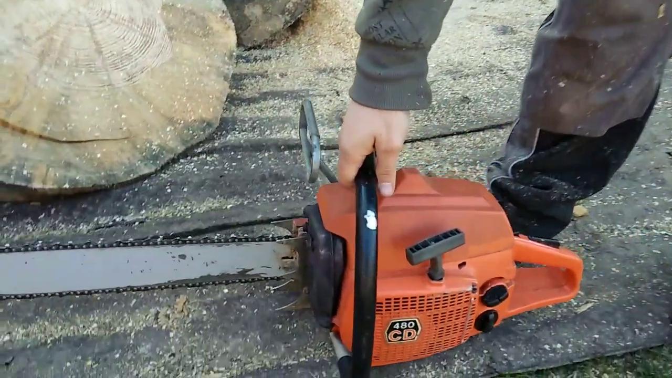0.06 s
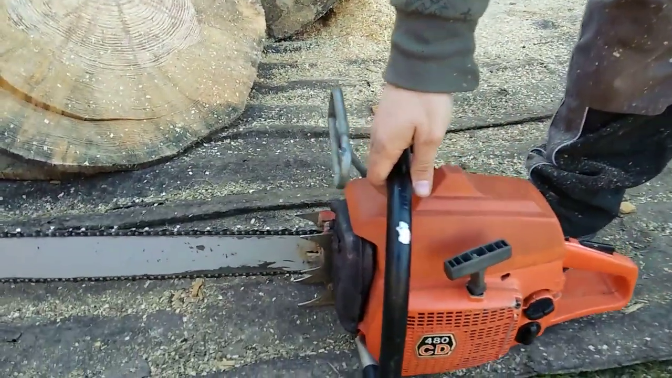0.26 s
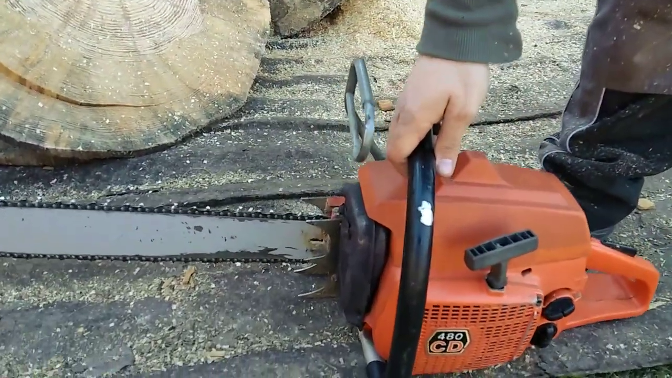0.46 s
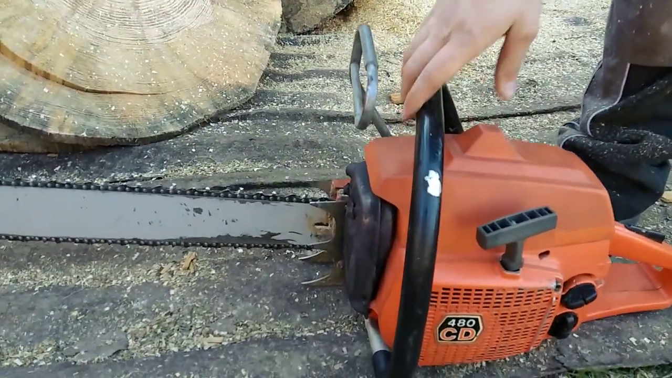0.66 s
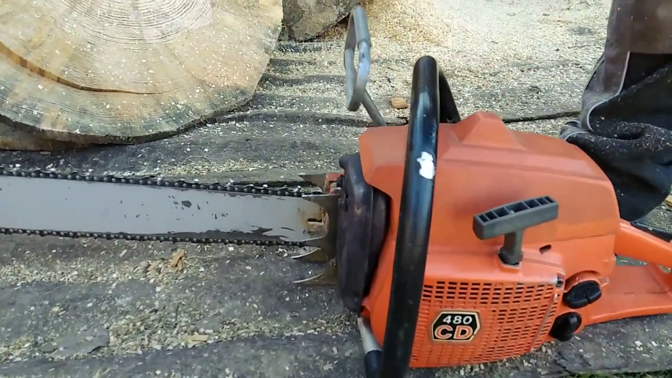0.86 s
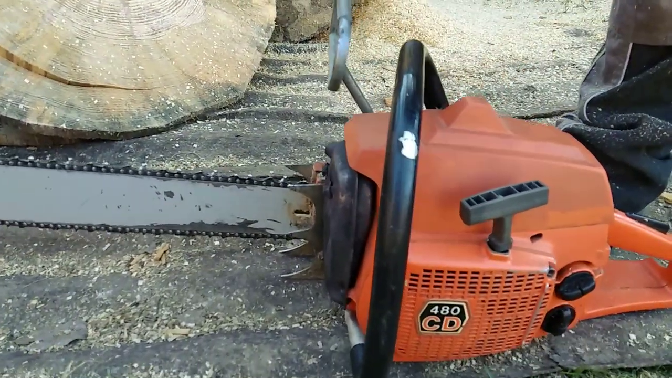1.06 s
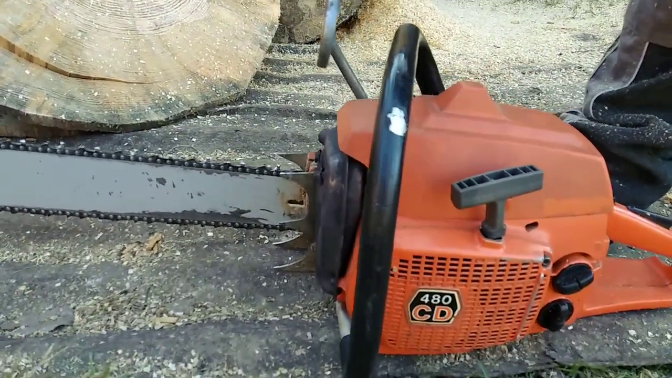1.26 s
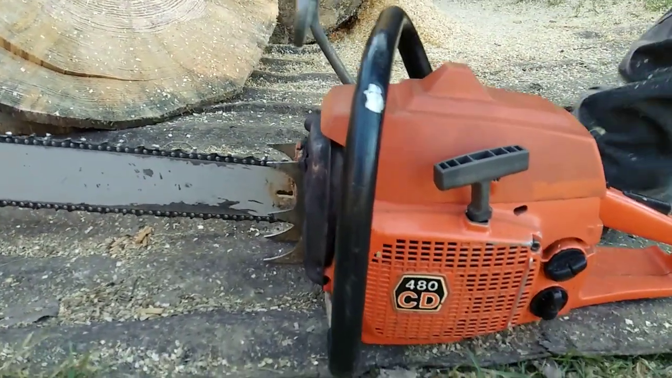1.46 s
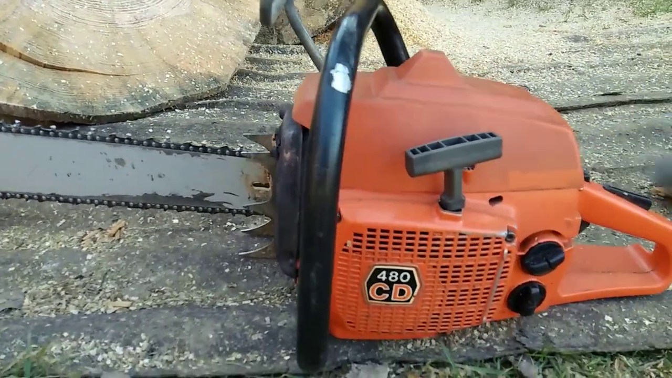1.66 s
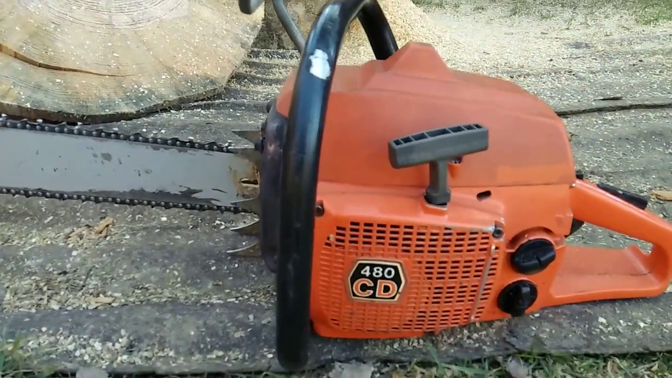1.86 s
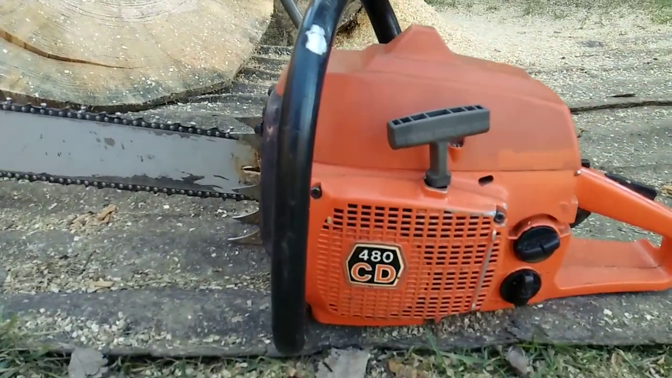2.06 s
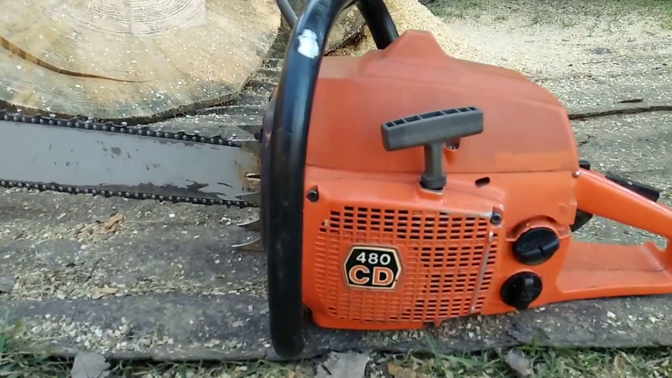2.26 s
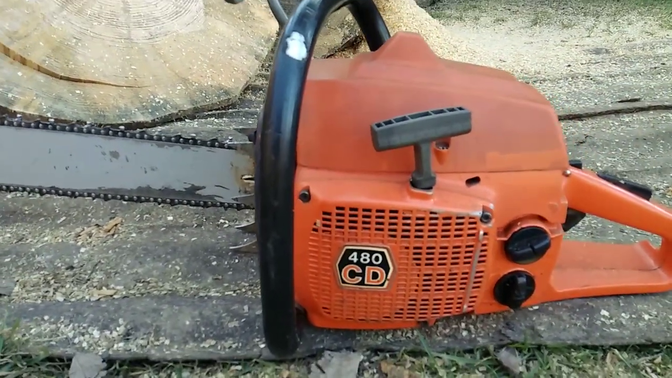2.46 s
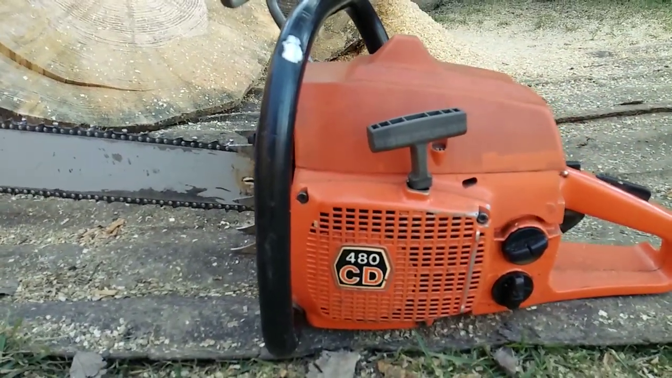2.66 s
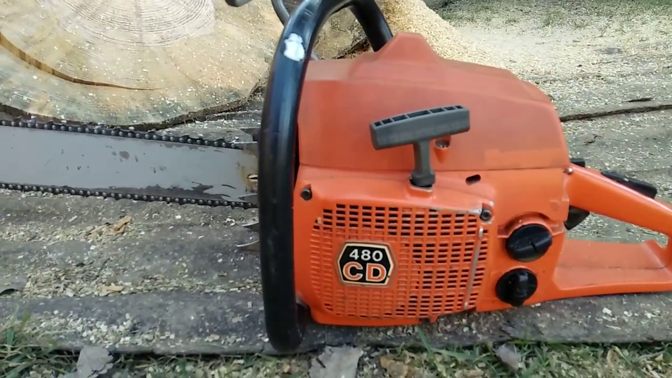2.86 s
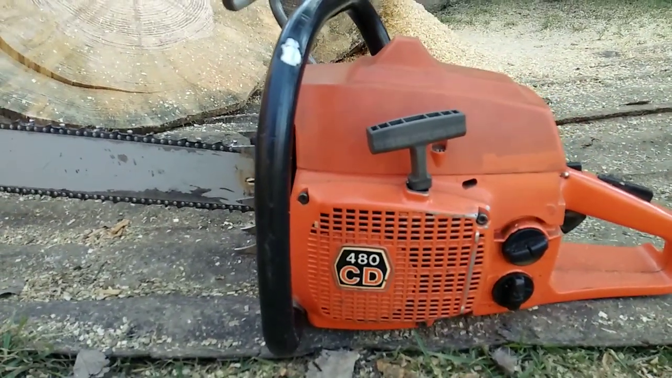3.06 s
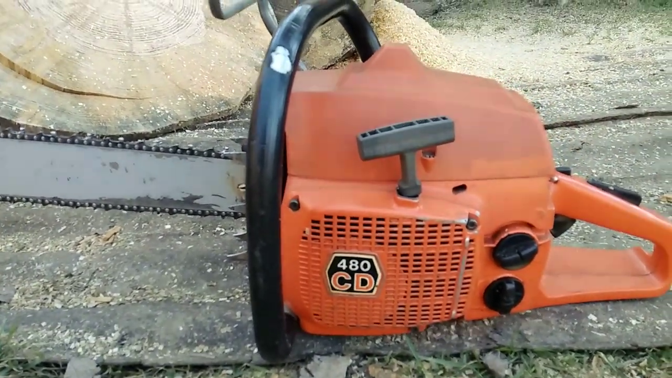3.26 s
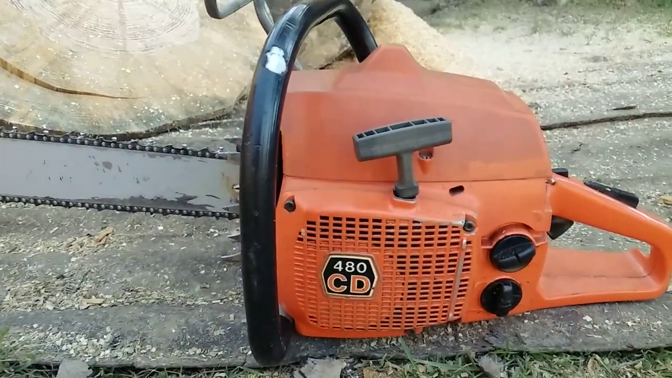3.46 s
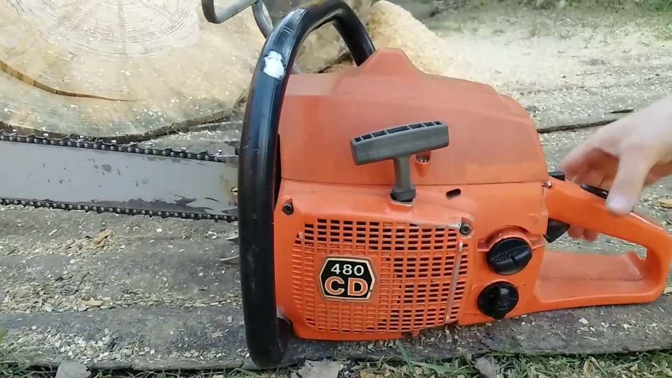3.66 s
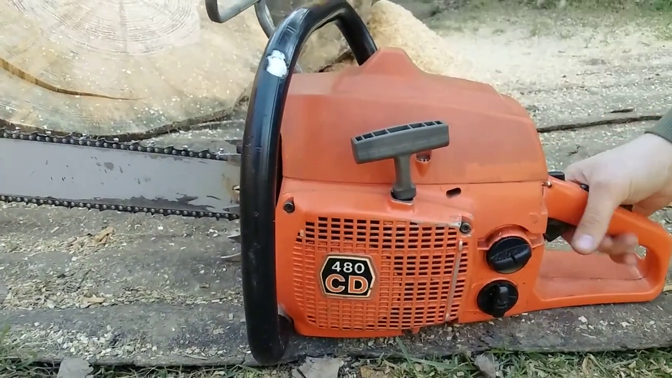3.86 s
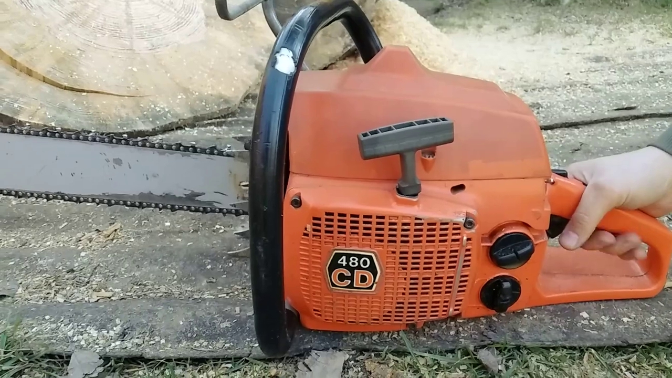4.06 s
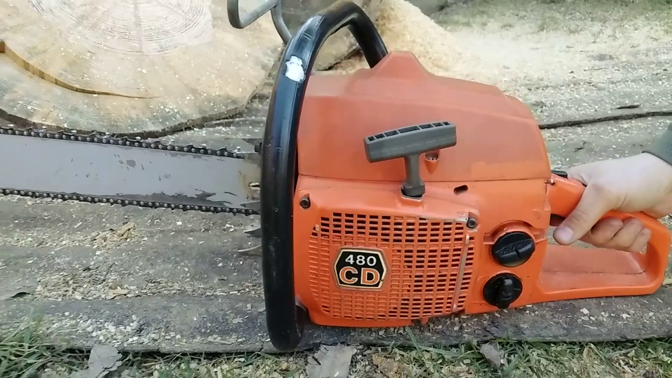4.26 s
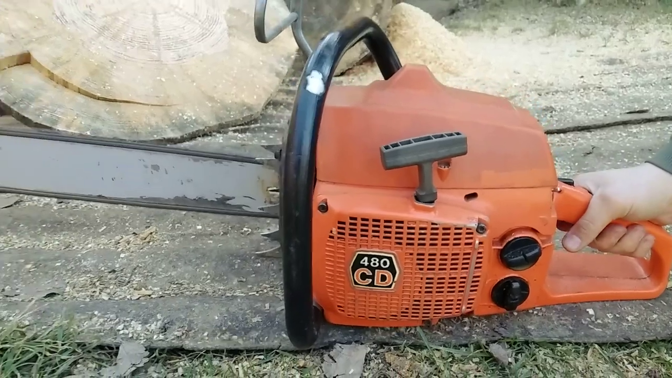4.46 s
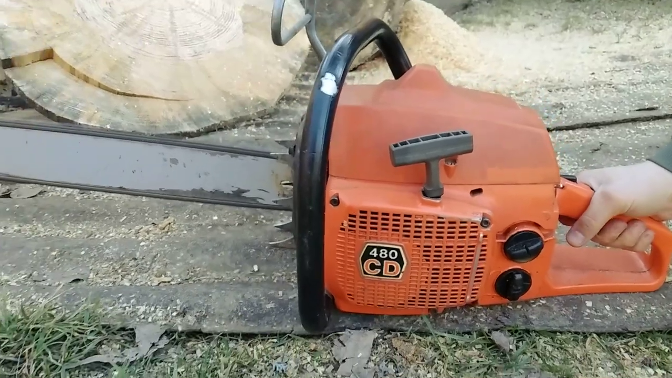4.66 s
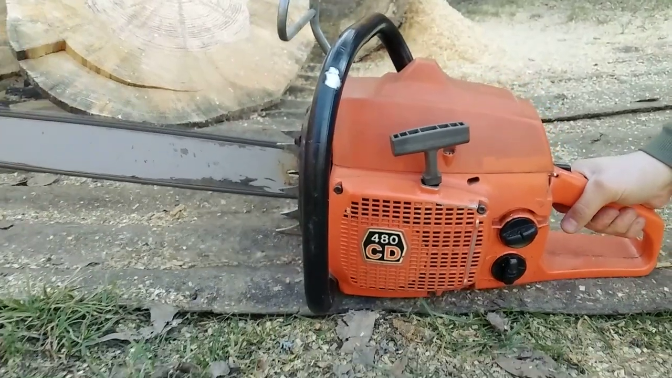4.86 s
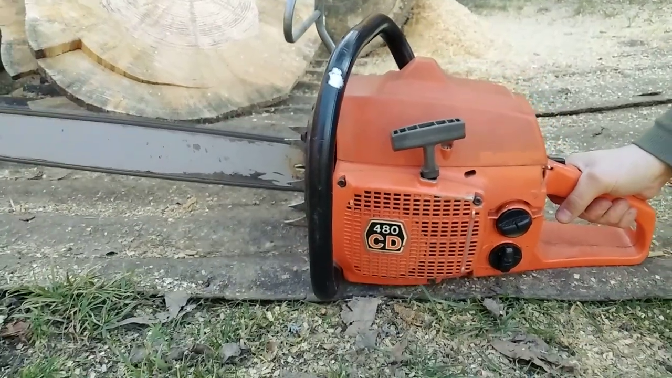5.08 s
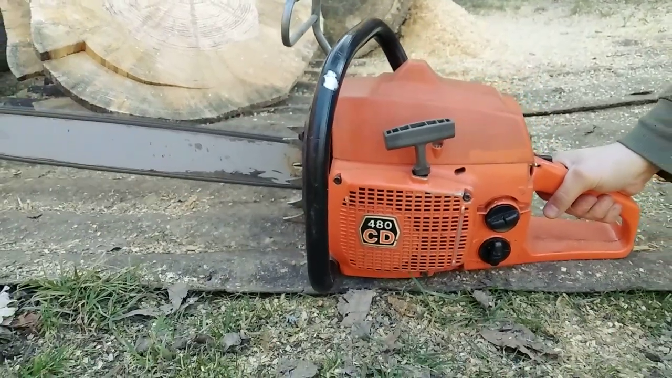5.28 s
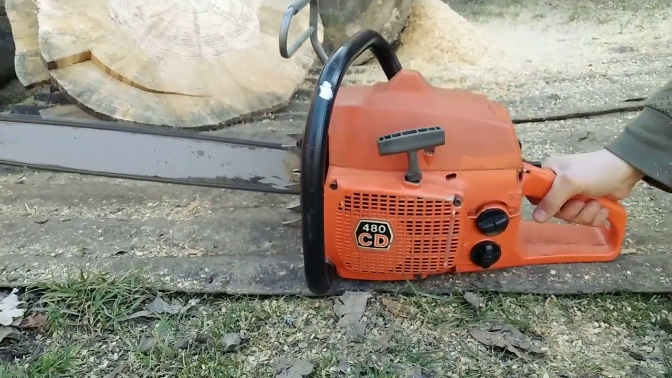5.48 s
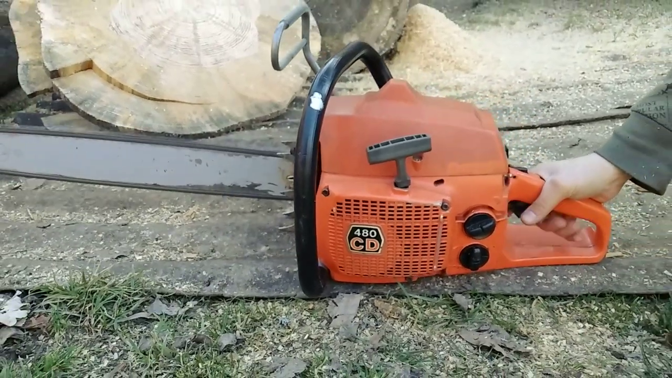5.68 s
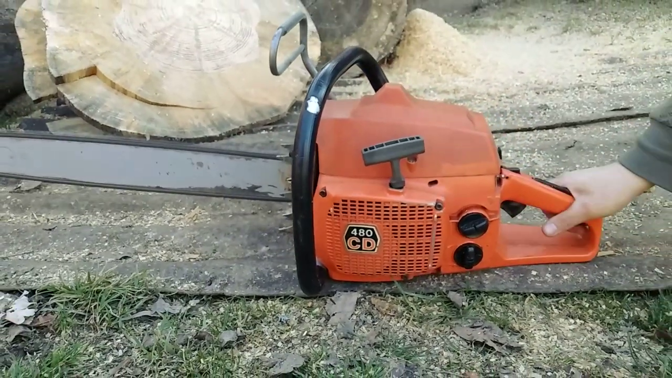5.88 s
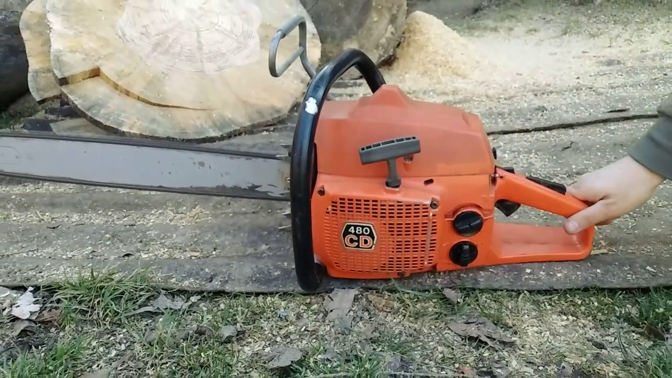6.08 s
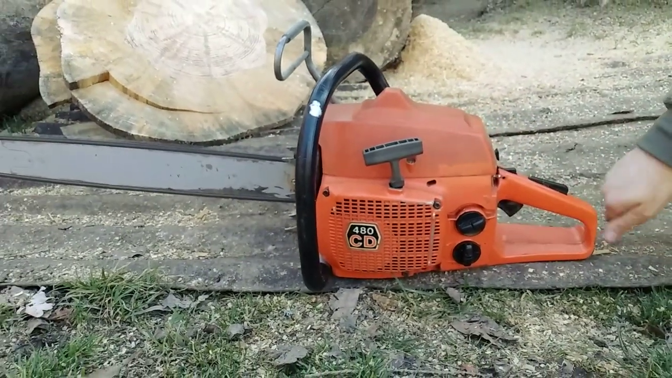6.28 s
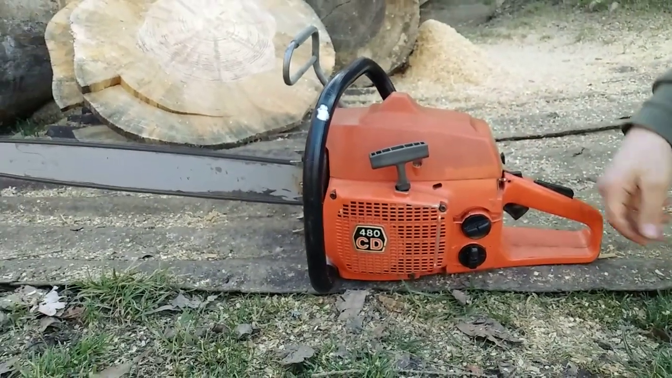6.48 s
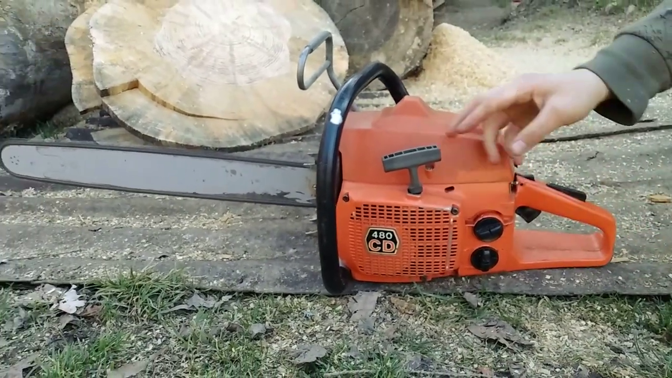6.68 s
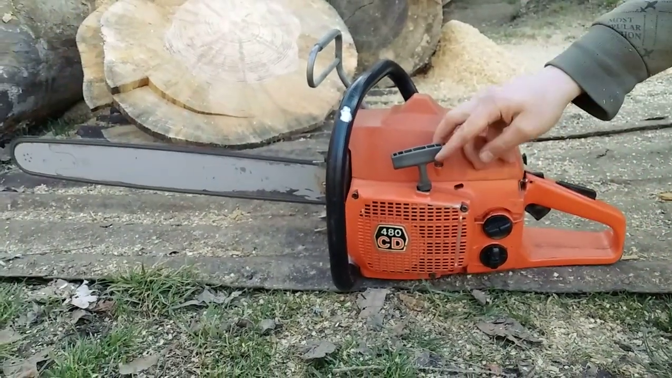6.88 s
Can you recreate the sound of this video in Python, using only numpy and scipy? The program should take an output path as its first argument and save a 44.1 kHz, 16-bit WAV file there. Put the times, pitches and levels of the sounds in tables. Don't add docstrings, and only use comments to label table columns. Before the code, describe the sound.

A two-stroke chainsaw idles close by outdoors, low uneven pops over a fast metallic rattle, clutch ticks and knocks. After more than four seconds the throttle opens: a barking intake growl climbs quickly to a harsh, whining full-speed roar with rushing chain. It holds briefly, then the throttle shuts and the pitch slides down as the chain coasts, with one hard bang and a few softer pops. Close stereo microphones, dry, slightly overloaded at the peaks.

```python
import sys
import numpy as np
from scipy import signal
from scipy.io import wavfile
from scipy.ndimage import uniform_filter1d

SR = 44100
rng = np.random.default_rng(int(sys.argv[2]) if len(sys.argv) > 2 else 0)


def transcribe(signal):
    frames = np.atleast_2d(signal).T
    limited = np.clip(frames, -1, 1)
    pcm = np.round(limited * 32767).astype(np.int16)
    wavfile.write(sys.argv[1], SR, pcm)


def boost_factor(decibels):
    exponent = np.asarray(decibels, float) / 20
    return 10 ** exponent


N = 305613

IDLE_TURNS_PER_S, FIRING_ANGLE = 35.3, .88
THROTTLE_OPENS_S, THROTTLE_SHUTS_S = 4.355, 5.71

# time in seconds, peak in dB, hiss of escaping gas in dB.
FIRINGS = [(0.016, -16, -20.5), (0.097, -32, -31), (0.156, -25, -24), (0.238, -24, -24.5), (0.32, -24, -22),
           (0.426, -27, -22.5), (0.533, -19, -21.5), (0.639, -25, -23), (0.775, -25, -27),
           (0.893, -20, -25.5), (1.006, -19, -24), (1.117, -22, -26), (1.19, -30, -30), (1.289, -15, -28),
           (1.465, -24, -21.5), (1.603, -23, -32), (1.717, -26, -30), (1.78, -26, -30), (1.863, -26, -33),
           (1.949, -28, -32), (2.06, -25, -29), (2.204, -24, -30), (2.349, -19, -32), (2.556, -22, -29),
           (2.676, -19, -22.5), (2.791, -15, -22), (2.905, -14.5, -29), (3.026, -22, -23.5),
           (3.139, -21, -25), (3.251, -29, -24), (3.36, -15, -23), (3.472, -24, -31), (3.556, -23, -29),
           (3.667, -25, -21.5), (3.779, -18.5, -20), (3.919, -11, -22.5), (4.031, -17, -37),
           (4.148, -26, -27), (4.302, -19, -25)]
# time in seconds, peak in dB, hiss of escaping gas in dB.
AFTERFIRES = [
    (5.929, -51, -67),
    (6.008, -22, -39),
    (6.202, -5, -13),
    (6.246, -22, -19),
    (6.487, -24, -30),
    (6.584, -16, -34),
    (6.744, -29, -34),
    (6.807, -10, -35),
]
# time in seconds, speed in turns per second.
REV_SPEED = [(4.3, 35.1), (4.38, 31.2), (4.42, 40.9), (4.5, 57.5), (4.56, 70), (4.64, 93.6), (4.74, 121.5),
             (4.86, 150.6), (4.94, 165.5), (5.0, 174.5), (5.1, 185), (5.72, 184.4), (5.8, 173),
             (5.92, 155.5), (6.17, 126), (6.45, 101), (6.69, 84.3), (6.93, 68.5)]
# time in seconds, peak in dB.
CLUTCH_KNOCKS = [(0.2024, -21), (0.794, -24), (0.8827, -14), (1.0515, -12), (1.1123, -18), (1.1613, -22),
                 (1.1912, -18), (1.2785, -23), (1.37, -17), (1.4611, -15.5), (1.568, -16), (1.942, -20),
                 (1.9733, -15.5), (2.1096, -18), (2.1415, -17), (2.1672, -16.5), (2.3117, -14.5),
                 (2.3387, -21), (2.4558, -15), (2.4854, -19), (2.515, -10), (2.5471, -17), (2.634, -16),
                 (2.663, -15), (2.7195, -24), (2.749, -21), (2.7801, -22), (2.8404, -14), (2.8712, -13.5),
                 (2.9018, -9), (2.9572, -16), (3.016, -18), (3.069, -12), (3.1305, -12), (3.1846, -18),
                 (3.2445, -15), (3.292, -18), (3.3233, -14), (3.3513, -18), (3.3794, -16), (3.405, -14),
                 (3.4333, -18), (3.463, -16), (3.5475, -10), (3.601, -18), (3.6275, -17), (3.6601, -16),
                 (3.743, -13), (3.7719, -14), (3.825, -16), (3.849, -17), (3.878, -14.5), (3.911, -17),
                 (3.9629, -17), (4.0193, -18), (4.0796, -20), (4.2004, -13.5), (4.291, -13), (4.32, -11),
                 (4.347, -13)]
# time in seconds, level in dB.
SHOE_TICK = [(0, -23), (1.4, -21.5), (1.8, -23), (2.4, -22), (4.35, -22.5), (4.45, -60)]
# time in seconds, peak in dB.
PISTON_SLAPS = [(0.1481, -19.5), (0.2334, -21), (0.2882, -21), (0.316, -15), (0.606, -26), (0.7721, -15),
                (0.8879, -22), (1.1957, -19), (1.2251, -16), (1.2535, -23.5), (1.3129, -18), (1.3992, -20),
                (1.5399, -20), (1.5688, -20), (1.5998, -16), (1.6561, -13), (1.713, -12), (1.7414, -14),
                (1.7735, -12.5), (1.8023, -18), (1.862, -13), (1.8901, -24), (1.9165, -14), (1.947, -21),
                (2.059, -12), (2.1169, -16), (2.146, -10), (2.171, -18), (2.2303, -15), (2.258, -13),
                (2.315, -18), (2.3445, -8), (2.374, -15), (2.4334, -15), (2.4628, -15), (2.4882, -13),
                (2.553, -16), (2.5805, -18), (2.6683, -16), (2.814, -14), (2.8464, -18), (2.8764, -20),
                (2.9064, -17), (3.021, -13), (3.05, -25), (3.2505, -16), (3.3516, -15), (3.3845, -22),
                (3.4685, -16), (3.542, -17), (3.7192, -25), (3.7459, -19), (3.7788, -21), (3.8048, -19),
                (3.8492, -15), (3.918, -17), (4.0287, -16), (4.055, -14), (4.2078, -16), (4.348, -26)]
# start in seconds, length in seconds, level in dB, pitch in Hz.
PLATE_CHIRPS = [
    (0.009, 0.045, -21.5, 6210),
    (0.09, 0.11, -30, 6200),
    (0.294, 0.17, -26.5, 6210),
    (0.5, 0.054, -28, 6250),
    (0.63, 0.064, -28.5, 6230),
    (1.043, 0.11, -30.5, 6140),
    (1.456, 0.079, -29, 6270),
]
# pitch in Hz, width in Hz, level in dB, end in seconds.
THIN_PARTS = [(3905, 32, -43, 4.2)]

# frequency in Hz, level in dB per Hz.
IDLE_COLOUR = [(80, 9), (200, 2.5), (300, 4), (500, -0.5), (900, -2), (1150, -15.5), (1450, 1), (2100, -4),
               (2900, 3.5), (3900, 4.5), (4800, -5), (6000, 0), (7500, -2.5), (8200, -18)]
# frequency in Hz, level in dB per Hz.
CHAIN_COLOUR = [(47, -55), (80, -21.5), (173, -13.5), (314, -10), (367, -10), (420, -11), (734, -13),
                (808, -15.5), (1960, -15), (3050, -10.5), (4580, -6.5), (8000, -9), (10400, -51),
                (17600, -120)]
# frequency in Hz, level in dB per Hz.
COAST_COLOUR = [(80, -16), (200, -6), (700, -5.5), (1000, -15), (1900, -10.5), (2600, -1.5), (3300, -17),
                (4000, -17), (4800, 1), (6000, -11), (8200, 0.5)]
# frequency in Hz, left-right difference in dB.
CHATTER_LEAN = [(60, 6), (150, 3), (380, 4), (950, 6.5), (2380, -1.5), (5980, -1), (15000, 29)]
# time in seconds, level in dB.
CHAIN_LEVEL = [
    (4.26, -37),
    (4.44, -29.5),
    (4.84, -14.5),
    (5.85, -14),
    (6.68, -17.5),
    (6.93, -19.5),
]
# time in seconds, share.
CHAIN_SHARE = [(4.45, 0), (4.85, 1), (5.95, 1), (6.25, 0)]
# time in seconds, share.
COAST_SHARE = [(5.95, 0), (6.25, 1)]
# time in seconds, 800-1300 Hz boost in dB.
OPEN_SIDE = [(0, 3.5), (1.2, 4.5), (1.6, 0.5)]

# pitch in Hz, width in Hz, level in dB, left-right difference in dB.
METAL = [(1440, 70, -8, 0), (4660, 120, -2, -3), (4940, 110, -3, -3), (5220, 110, -10, 3)]
# pitch in Hz, width in Hz, level in dB, left-right difference in dB.
CRANKCASE = [(124, 51, 1.6, 3.2), (179.4, 36, 0, 0.98)]
# pitch in Hz, width in Hz, level in dB, left-right difference in dB.
TRANSFER_PORTS = [(270, 60, -3, 0.99), (424, 72, -7, 2.9), (508, 60, -10, 5.1), (950, 67, -21, 0.5)]
# pitch in Hz, width in Hz, level in dB, left-right difference in dB.
MUFFLER = [(290, 150, -10, 7), (430, 160, 3, 1), (610, 290, -14, -6), (940, 340, -24, -4)]
# pitch in Hz, width in Hz, level in dB, left-right difference in dB.
AIR_CLEANER = [(470, 210, -2.5, 5), (774, 95, -4, 1.1)]

# speed in turns per second, level in dB.
INTAKE_OPEN = [(31, -15.5), (66, -11), (110, -17), (137, -22), (165, -24), (185, -24)]
# speed in turns per second, orders 1, 2, 3, 4, 6 in dB.
ORDER_LEVELS = [(40, -70, -45, -30, -66, -40), (60, -60, -24, -23, -66, -22), (92, -36, -23, -25, -66, -28),
                (118, -26, -25, -23, -63, -32), (136, -25, -31, -28, -40, -40),
                (148, -25, -26, -40, -33, -50), (166, -30, -23, -50, -40, -50),
                (183.9, -35, -22, -60, -45, -50)]
ORDER_SHUT_DB = [-11.5, -58, -34, -27, -29]
ORDER_LAG = [1.04, 1.9, 0.86, 4, 0.8]
# time in seconds, level in dB.
FAN_LEVEL = [(4.8, -52), (4.85, -23), (4.93, -6), (5.0, -11.5), (5.1, -8.5), (5.3, -15.5), (5.45, -21),
             (5.65, -11), (5.73, -10), (5.87, -9.5), (5.93, -25), (5.97, -50), (6.2, -50), (6.3, -23),
             (6.5, -37), (6.6, -36), (6.7, -18.5), (6.93, -35)]
# time in seconds, level in dB.
CHAIN_WHINE = [(4.95, -50), (5.1, -28), (5.5, -27), (5.6, -21), (5.76, -19), (5.85, -50)]
# time in seconds, change in dB.
PUMP_CHANGE = [(6.25, -7), (6.55, 2)]

# time in seconds, cover ring in Hz, cover ring in dB,
# left-right difference in dB, nearness in dB.
LISTENER = [(0, 1816, -31.5, -2, -6.5), (1.2, 1710, -28, -0.5, -0.2), (1.8, 1833, -26, -4, -0.9),
            (3.4, 1874, -27, -4, -1), (4.4, 1853, -30, -2, 0), (4.55, 1890, -25, -3, -3),
            (5.6, 1847, -33, -1.5, 2), (6.2, 1930, -32, -7.5, 2), (6.93, 1842, -29, 2, -2.5)]
# time in seconds, share lost in the low, middle and high
SHARE_LOST = [(2.4, .1, 0, 0), (2.9, .55, 0, 0), (4.3, .6, .1, 0), (4.42, .8, .4, 0), (4.52, .95, .95, .3),
              (4.6, .6, .4, .5), (4.78, .5, .2, .6), (4.85, 0, 0, 0), (6.05, 0, 0, 0), (6.2, .2, .9, .8),
              (6.3, .5, .99, .97), (6.45, .95, .99, .99), (6.58, .95, .99, .99), (6.65, .2, .7, .99),
              (6.93, 0, .6, .97)]
OPPOSED_HZ = [2500, 2900, 3200, 4000]
# frequency in Hz, limit in dB.
WEAK_LIMIT = [(1900, -30), (2300, -4.5), (2800, -2.6), (3800, -2.2), (4300, -6), (5900, -2.8), (7600, -6),
              (8300, .3), (15000, .3)]
# time in seconds, change in dB.
RUMBLE_CHANGE = [(3.9, -5), (4.4, 8), (5.9, 2), (6.6, -8.0)]
# shift in Hz, level in dB.
TREBLE_COPIES = [(4300, -17.0), (7600, -24), (9900, -27)]
# time in seconds, change in dB.
TREBLE_CHANGE = [(1.0, 6), (2.0, 2.5), (4.4, 0.5), (4.7, 1), (6.0, 2.5), (6.4, -3.5)]
# time in seconds, share gone.
TREBLE_GONE = [(5.9, 0), (6.15, .98)]


def rms_one(x):
    return x / np.sqrt(np.mean(x ** 2) + 1e-20)


def in_time(rows):
    s, *columns = np.transpose(rows)
    return [np.interp(np.arange(N) / SR, s, c) for c in columns]


def by_speed(rows, speed):
    turns_per_s, *columns = np.transpose(rows)
    return [np.interp(speed, turns_per_s, c) for c in columns]


def at_hz(rows, hz):
    table_hz, value = np.transpose(rows)
    return np.interp(np.log(hz), np.log(table_hz), value)


def sides(db):
    half = np.atleast_1d(db) / 2
    return boost_factor(np.array([half, -half]))


def lowcut(x, order, hz):
    return signal.sosfilt(signal.butter(order, hz, "high", fs=SR, output="sos"), x)


def band(x, order, edges_hz):
    return signal.sosfilt(signal.butter(order, edges_hz, "band", fs=SR, output="sos"), x)


def ring(x, hz, width_hz):
    r = np.exp(-np.pi * width_hz / SR)
    if np.ndim(hz) == 0:
        w = 2 * np.pi * hz / SR
        return signal.lfilter([0, r * np.sin(w)], [1, -2 * r * np.cos(w), r * r], x + 1e-18)
    spin = np.exp(2j * np.pi * np.cumsum(hz) / SR)
    return (spin * signal.lfilter([1], [1, -r], x / spin + 1e-18)).imag


def body(x, modes):
    return sum((-1) ** k * boost_factor(db) * sides(lean_db) * ring(x, hz, width_hz)
               for k, (hz, width_hz, db, lean_db) in enumerate(modes))


def evened(x, window_s):
    power = uniform_filter1d(np.mean(x, 0) ** 2, int(window_s * SR))
    return x / np.sqrt(power + 1e-12)


def flicker(spread_db, block=1024):
    steps = boost_factor(spread_db * rng.standard_normal((2, N // block + 1)))
    return uniform_filter1d(np.repeat(steps, block, axis=1)[:, :N], size=block // 2)


def pair():
    alike, delay = .051, 6
    left, other = rng.standard_normal((2, N))
    return np.array([left, alike * np.roll(left, delay) + np.sqrt(1 - alike ** 2) * other])


def later(x, left, right):
    return np.array([np.roll(x[0], left), np.roll(x[1], right)])


def per_turn(turns, spread_db):
    return boost_factor(spread_db * rng.standard_normal(600)[turns.astype(int)])


def pulses(turns, angle, spread_db):
    passing = np.diff(np.floor(turns - angle), prepend=0).clip(0, 1)
    return per_turn(turns, spread_db) * passing


def bursts(times, db, t60):
    clicks = np.zeros(N)
    clicks[(np.array(times) * SR).astype(int)] = boost_factor(db)
    rise = signal.lfilter([.02], [1, -.98], clicks / 0.051)
    return signal.lfilter([.02], [1, -boost_factor(-60 / (t60 * SR))], rise)


def shaking(turns, speed, angle, depth, spread_db):
    slow = np.clip(45 / speed, 0, 1) ** 5.4
    beat = np.exp(depth * slow * np.cos(2 * np.pi * (turns - angle)))
    even_power = np.i0(2 * depth * slow) ** .5
    return beat / even_power * per_turn(turns - angle + 1.5, spread_db) ** slow


def crank():
    s, t = np.transpose(FIRINGS)[0], np.arange(N) / SR
    whole = np.cumsum(np.round(np.diff(s, prepend=s[0]) * IDLE_TURNS_PER_S))
    speed, = in_time(REV_SPEED)
    return FIRING_ANGLE + np.interp(t, s, whole) + np.cumsum(speed * (t > s[-1])) / SR, speed


def throttle():
    return in_time([(THROTTLE_OPENS_S, 0), (THROTTLE_OPENS_S + 0.013, 1),
                    (THROTTLE_SHUTS_S, 1), (THROTTLE_SHUTS_S + 0.068, 0)])[0]


def rumble():
    deep = band(pair() + rng.standard_normal(N), 2, [15, 60])
    return boost_factor(-59 + in_time(RUMBLE_CHANGE)[0]) * rms_one(deep)


def squeaks():
    shake, out = pair(), 0
    for s, length, db, hz in PLATE_CHIRPS:
        end = s + length
        present, = in_time([(s - .01, 0), (s + 0.013, 1), (end - .01, 1), (end + 0.0086, 0)])
        out = out + boost_factor(db) * rms_one(ring(shake, hz, 26)) * present
    for hz, width_hz, db, until in THIN_PARTS:
        present, = in_time([(until, 1), (until + 0.2, .2)])
        out = out + boost_factor(db) * flicker(6.9, block=4096) * rms_one(ring(pair(), hz, width_hz)) * present
    return out


def pumping(turns, coasting):
    puff = ring(pulses(turns, .9, spread_db=1.0), 350, 700) * sides(1.5)
    return coasting * boost_factor(-33 + in_time(PUMP_CHANGE)[0]) * evened(puff, window_s=.1)


def exhaust_port(turns, speed, opened):
    best_speed, fade_db = 112, .17
    click = pulses(turns, .9, spread_db=1.0)
    port = ring(ring(click, 1450, 170), 1450, 170)
    port_db = -51 * opened - 36 * (1 - opened) - fade_db * abs(speed - best_speed)
    return boost_factor(port_db + 7) * evened(port * sides(-3.0), window_s=.1)


def engine_orders(turns, speed, opened):
    leans_db = [6.0, 10.0, 3.0, -16.0, 9.0]
    levels_db = by_speed(ORDER_LEVELS, speed)
    out = 0
    for k, db, shut_db, lean_db, lag in zip([1, 2, 3, 4, 6], levels_db, ORDER_SHUT_DB, leans_db, ORDER_LAG):
        tone = np.sin(2 * np.pi * k * turns + [[0], [lag]])
        out = out + boost_factor(db + shut_db * (1 - opened) + 5.0) * sides(lean_db) * tone
    return out


def fan(turns, speed):
    lag = 1.2 + .6 * np.clip((speed - 172) / 12, 0, 1)
    flutter = uniform_filter1d(flicker(1.5, block=2048)[0], size=1500)
    tone = np.sin(2 * np.pi * 24 * turns + np.array([[0], [1]]) * lag)
    return flutter * boost_factor(in_time(FAN_LEVEL)[0]) * tone * sides(-4.0)


def chain_whine(turns):
    wander = np.cumsum(.05 * rng.standard_normal(N))
    return flicker(5, block=2048) * boost_factor(in_time(CHAIN_WHINE)[0]) * np.sin(2 * np.pi * 27 * turns + wander)


def clutch(turns):
    out = np.zeros((2, N))
    fade = np.arange(int(.03 * SR)) / SR
    shape = np.exp(-fade / 0.0072) * (1 - np.exp(-fade / 0.00033))
    drum_hz = 4568 + 87 * rng.standard_normal(len(CLUTCH_KNOCKS))
    for (s, db), hz in zip(CLUTCH_KNOCKS, drum_hz):
        phase = rng.uniform(0, 5.9, (2, 3, 1))
        tones = np.sin(2 * np.pi * hz * np.outer([1, 1.035, 1.08], fade) + phase)
        out[:, int(s * SR):][:, :len(fade)] += boost_factor(db - 2.0) * tones.sum(1) * shape
    return out + boost_factor(in_time(SHOE_TICK)[0]) * body(pulses(turns, .62, spread_db=-0.5), METAL)


def cover(turns, speed):
    hz, ring_db, *_ = in_time(LISTENER)
    chatter = shaking(turns, speed, angle=.78, depth=.8, spread_db=1.5)
    knock = pair() * chatter + 1.4 * pulses(turns, 0.55, spread_db=4.0)
    ringing = evened(ring(ring(knock, hz, 220), hz, 380), window_s=0.018)
    ringing = boost_factor(ring_db - (speed < 45)) * sides(3.5) * ringing
    s, db = np.transpose(PISTON_SLAPS)
    slaps = (.5 + .5 * pair()) * bursts(s, db - 18.5, t60=.012) * np.cos(2 * np.pi * np.cumsum(hz) / SR)
    return ring(ring(slaps, hz, 190), hz, 320) * boost_factor(-19.5) + ringing


def casing(turns, speed):
    level_db, = in_time(CHAIN_LEVEL)
    pan_db, open_db = in_time(LISTENER)[2], in_time(OPEN_SIDE)[0]
    chain, = in_time(CHAIN_SHARE)
    coast, = in_time(COAST_SHARE)
    gaining = np.clip(np.gradient(speed) * SR / 200, 0, 1)
    low_db = 1.44 - 1.5 * gaining - 2.5 * coast
    shut_db = -2.5 * (speed > 60) * (1 - throttle())
    calm_db = -6 * coast
    s, peak_db, hiss_db = np.transpose(FIRINGS + AFTERFIRES)
    blow = bursts(s, hiss_db + 5.0, t60=0.036) / boost_factor(level_db) * sides(-1.5)
    low = shaking(turns, speed, angle=.78, depth=.35, spread_db=1.0)
    high = shaking(turns, speed, angle=.68, depth=.5, spread_db=1.0)
    white, out = [pair(), pair()], 0
    edges = [70, 110, 155, *200 * 2 ** np.arange(0, 5.4, 1 / 3)]   # Hz, third octaves from 200
    for k, (a, b) in enumerate(zip(edges, edges[1:])):
        hz = np.sqrt(a * b)
        idle, rush, free = (at_hz(t, hz) - at_hz(t, 4800) for t in (IDLE_COLOUR, CHAIN_COLOUR, COAST_COLOUR))
        colour = idle * (1 - chain - coast) + rush * chain + free * coast
        colour = colour + low_db * (hz < 2500) + shut_db * (hz < 700) + calm_db * (hz < 1000)
        colour = colour + open_db * (800 < hz < 1300)
        noise = band(white[k % 2][:1 if hz < 200 else 2], 2, [a, b])
        shake = (low if hz < 2500 else high) + blow
        out = out + boost_factor(colour) * shake * noise * sides(at_hz(CHATTER_LEAN, hz)) * flicker(1.5)
    rings = sum(boost_factor(db) * sides(lean_db) * ring(white[0] * high ** 2, hz, width_hz) * np.sqrt(width_hz / SR)
                for hz, width_hz, db, lean_db in METAL)
    out = boost_factor(level_db + 12.5) * sides(pan_db) * (out + 0.45 * rings)
    hollow = band(out, 1, [2450, 3500])
    return out - (.4 + .1 * coast) * hollow - (.2 + .05 * coast) * hollow[::-1]


def exhaust():
    s, peak_db, hiss_db = np.transpose(FIRINGS + AFTERFIRES)
    after = s > THROTTLE_OPENS_S
    clicks = np.zeros(N)
    clicks[(s * SR).astype(int)] = -boost_factor(peak_db - 18 - 13.0 * after)
    hiss = 0.18 * bursts(s, peak_db - 7.3 * after, t60=0.082) * rng.standard_normal(N)
    stray = clicks * (1 - throttle()) * (np.arange(N) > THROTTLE_SHUTS_S * SR)
    return body(clicks + hiss, MUFFLER) + 0.9 * body(stray, CRANKCASE)


def intake(turns, intake_db):
    shut, puff = pulses(turns, .585, spread_db=1.0), pulses(turns, .17, spread_db=1.0)
    bark = body(shut, AIR_CLEANER) + 1.1 * sides(5.0) * ring(puff, 450, 450)
    return boost_factor(intake_db) * evened(band(bark, 4, [270, 1050]), window_s=0.064)


def charge_db(turns):
    spent_db, refill_turns = -6, 1.97
    s, peak_db = np.transpose(FIRINGS)[:2]
    fired = turns[(s * SR).astype(int)]
    last = np.clip(np.searchsorted(fired, turns + .25) - 1, 0, None)
    strong = np.clip((peak_db[last] - peak_db.min()) / 6.2, 0, 1)
    since = np.clip(turns - fired[last], 0, None)
    return spent_db * strong * np.exp(-since ** 2 / refill_turns ** 2)


def crankcase(turns, thump_db):
    push = .8 * pulses(turns, .1, spread_db=1.2) - pulses(turns, .74, spread_db=1.2)
    push = boost_factor(charge_db(turns)) * push + .006 * rng.standard_normal(N)
    pop = pulses(turns, .93, spread_db=2.0)
    return boost_factor(thump_db) * evened(body(push, CRANKCASE) + body(pop, TRANSFER_PORTS), window_s=0.57)


def opposed(x):
    shared = signal.sosfiltfilt(signal.butter(7, OPPOSED_HZ[::3], "band", fs=SR, output="sos"), x.mean(0))
    below = [signal.sosfiltfilt(signal.butter(8, hz, fs=SR, output="sos"), shared) for hz in OPPOSED_HZ[1:3]]
    bands = np.diff([0 * shared, *below, shared], axis=0)
    return x - np.sum(np.array(in_time(SHARE_LOST)) * bands, axis=0)


def scene():
    (turns, speed), opened = crank(), throttle()
    running = speed > 60
    coasting = running * (1 - opened)
    nearness_db = in_time(LISTENER)[3]
    thump_db = -25.5 + nearness_db - 3 * coasting - 1.6 * np.clip(speed - 76.6, 0, None)
    intake_db = (-61.5 - 11 * running) * (1 - opened) + by_speed(INTAKE_OPEN, speed)[0] * opened
    whines = chain_whine(turns) + fan(turns, speed) + engine_orders(turns, speed, opened)
    whines = whines + exhaust_port(turns, speed, opened)
    metal = squeaks() + clutch(turns) + cover(turns, speed) + casing(turns, speed)
    engine = pumping(turns, coasting) + later(exhaust(), 40, 0)
    engine = engine + later(intake(turns, intake_db), 0, 14) + crankcase(turns, thump_db)
    return opposed(whines + metal + engine)


def treble(main):
    blur = np.cumsum(.25 * rng.standard_normal(N))
    copies = sum(boost_factor(db) * flicker(spread_db=1.5) * np.cos(2 * np.pi * hz * np.arange(N) / SR + blur)
                 for hz, db in TREBLE_COPIES)
    top = signal.sosfilt(signal.cheby2(12, 40, [8350, 16100], "band", fs=SR, output="sos"), main * copies)
    slow, fast = uniform_filter1d(abs(top), size=9000), uniform_filter1d(abs(top), size=600)
    top = top * np.sqrt(slow / (fast + 1e-9))
    gone, = in_time(TREBLE_GONE)
    top = (1 - gone) * top + gone * lowcut(top, 8, 10200)
    return top * boost_factor(in_time(TREBLE_CHANGE)[0])


def without_weak_patches(x):
    hz, s, z = signal.stft([x[0] + x[1], x[0] - x[1]], SR, "cosine", 2048)
    power = abs(z) ** 2
    patch = uniform_filter1d(uniform_filter1d(power, size=7, axis=1), size=2, axis=2)
    around = uniform_filter1d(np.log(patch + 1e-16), size=36, axis=1)
    around = np.exp(uniform_filter1d(around, size=7, axis=2))
    strong_patch = patch > around * boost_factor(2 * at_hz(WEAK_LIMIT, hz + 1))[:, None]
    strong_line = (power > 1.5 * patch) | (hz < 8300)[:, None]
    both, apart = signal.istft(z * (strong_patch & strong_line), SR, "cosine", 2048)[1][:, :N] / 2
    return np.array([both + apart, both - apart])


def top_cut(x):
    return signal.sosfilt(signal.butter(12, 15600, fs=SR, output="sos"), x)


def record(dry):
    main = lowcut(dry, 4, 92)
    main = signal.sosfilt(signal.cheby2(12, 40, 8300, fs=SR, output="sos"), main)
    main = main + rumble()
    top = treble(main)
    main = 1.15 * np.tanh(main / 1.15)
    mix = np.clip(without_weak_patches(main + top), -1, 1)
    return top_cut(mix)


dry = scene()
out = record(dry)
transcribe(out)
```